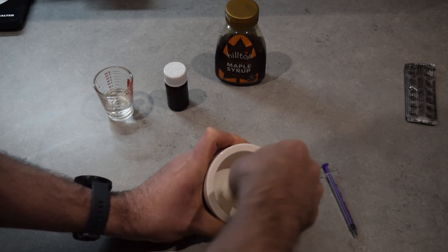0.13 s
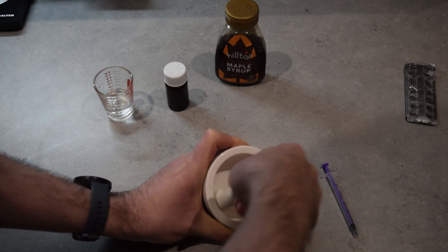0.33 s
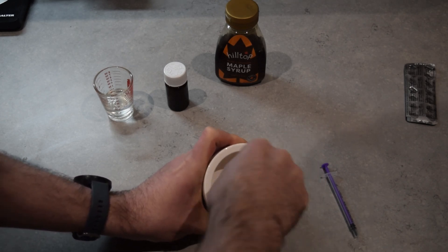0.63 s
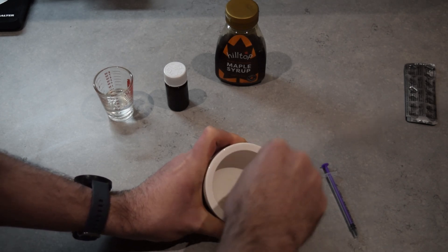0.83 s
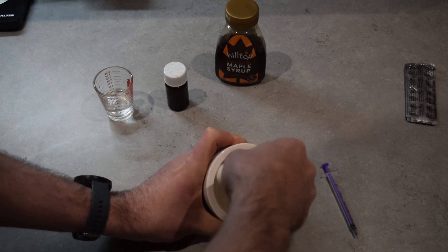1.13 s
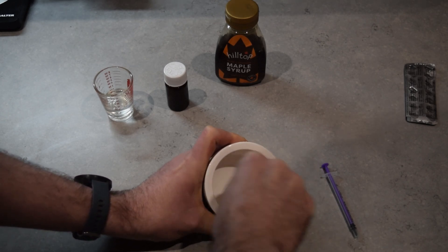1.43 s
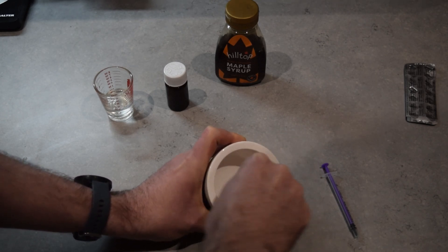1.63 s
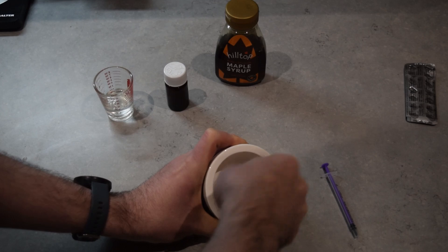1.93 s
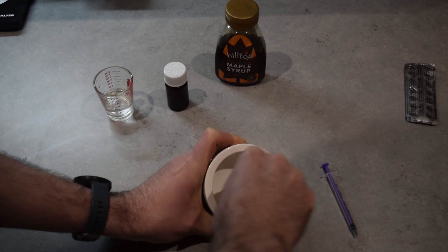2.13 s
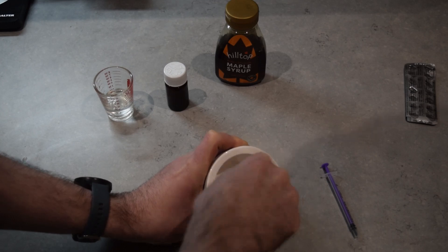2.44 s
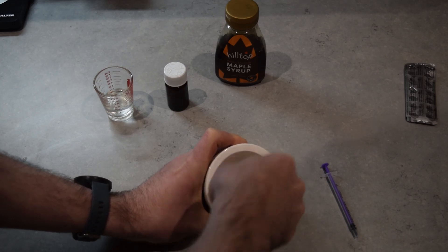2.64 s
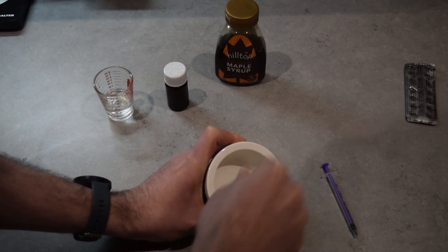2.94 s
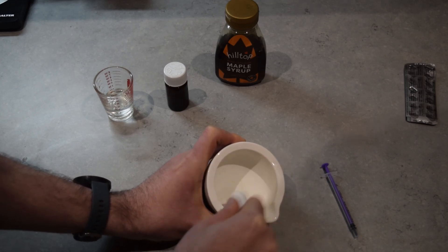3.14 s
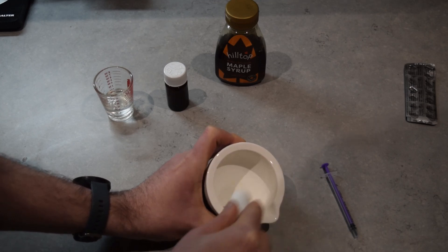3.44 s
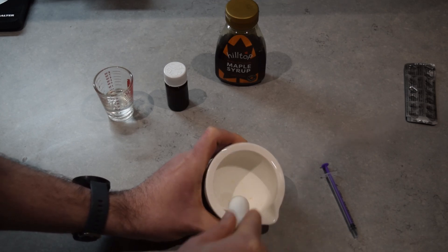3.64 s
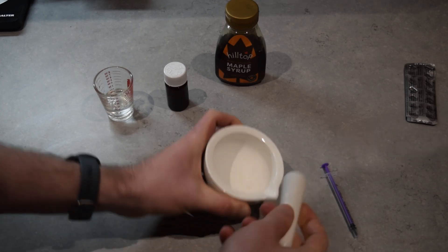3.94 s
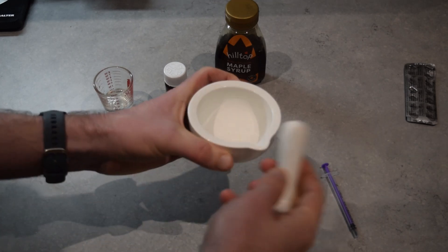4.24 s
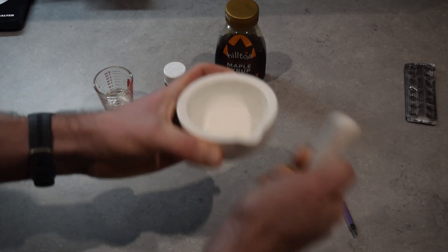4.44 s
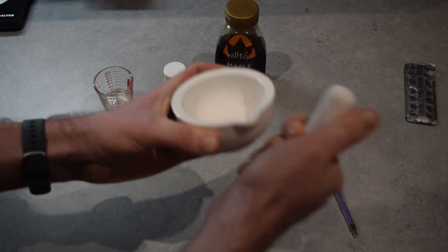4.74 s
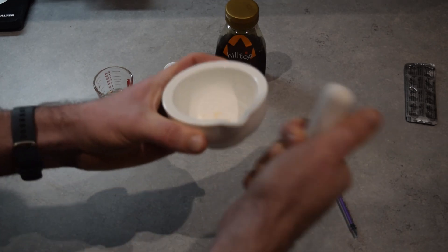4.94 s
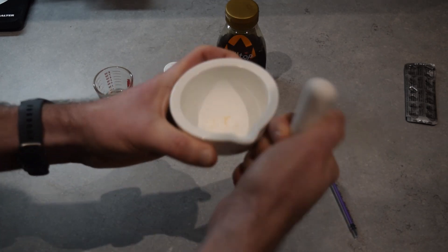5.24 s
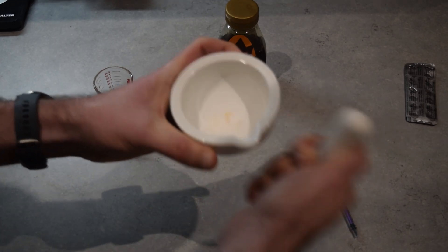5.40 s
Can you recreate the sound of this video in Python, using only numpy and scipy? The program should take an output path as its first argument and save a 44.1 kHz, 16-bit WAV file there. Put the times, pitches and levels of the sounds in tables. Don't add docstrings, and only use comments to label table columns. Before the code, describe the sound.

A ceramic pestle knocks and grinds in a hand-held mortar, then raps its rim in five bright clinks, followed by faint soft taps in a quiet kitchen.

```python
import sys
import numpy as np
from scipy import signal
from scipy.fft import rfft, irfft
from scipy.io import wavfile

SR = 44100
rng = np.random.default_rng(int(sys.argv[2]) if len(sys.argv) > 2 else 0)


def convert_level_to_amplitude(level_db):
    exponent = np.asarray(level_db, float) / 20
    return 10 ** exponent


def generate_wav(signal):
    frames = np.transpose(np.atleast_2d(signal))
    scaled = np.clip(frames, -1, 1) * 32767
    pcm = np.round(scaled).astype(np.int16)
    wavfile.write(sys.argv[1], SR, pcm)


N = 245626


def mortar():
    s, knock_db, hollow_db, ring_db, rim_db, crack_db = blows()
    rough_s, *rough_db, rough_crack_db = rough_contacts()
    rough_knock, rough_hollow, rough_ring, rough_rim = (bursts(rough_s, db, length=0.033) for db in rough_db)
    pressure, hiss = grinding()
    coarse, fine = grit(per_s=900, uneven_db=4.5), grit(per_s=6300, uneven_db=3.5)
    dull = slab(s, knock_db, shoving() * coarse)
    dull = dull + worktop(s, knock_db, pressure, rough_knock, coarse)
    dull = dull + bowl_air(s, hollow_db, pressure, rough_hollow)
    bright = ceramic(s, ring_db, (hiss * convert_level_to_amplitude(-31.0) + rough_ring * convert_level_to_amplitude(-26)) * fine)
    bright = bright + rim(s, rim_db, (hiss * convert_level_to_amplitude(-31) + rough_rim * convert_level_to_amplitude(-26.0)) * fine)
    bright = bright + lip(s, rim_db, hiss * fine)
    bright = bright + pestle(s, crack_db, hiss * fine)
    bright = bright + powder(hiss, fine)
    bright = bright + crack(s, crack_db - 7, length=0.005)
    bright = bright + crack(rough_s, rough_crack_db - 5.5, length=0.022)
    return dull + bright * convert_level_to_amplitude(np.array([[-.7], [.7]]))


RAPS_FROM_S, RAPS_TO_S = 3.0, 3.7
# t/s, worktop knock level/dB, bowl hollow level/dB, ceramic ring level/dB, rim ring level/dB
BLOWS = [(0.048, -11.5, -12.5, -43, -72.5), (0.301, -11.5, -15, -33, -62), (0.577, -31.5, -26, -18.5, -21),
         (0.978, -22, -34, -29, -69), (1.104, -24, -36.5, -57, -67), (1.302, -35.5, -41.5, -34, -48),
         (1.541, -27.5, -52, -78, -78), (2.292, -53, -46, -50, -57), (2.369, -34, -43.5, -55, -77),
         (2.762, -34, -33, -30.5, -50.5), (3.12, -18, -20.5, -11, -10), (3.276, -14.5, -17, -12, -14.5),
         (3.44, -13.5, -16, -14, -15), (3.5841, -17.5, -19.5, -12.5, -14), (3.755, -38, -22, -13.5, -14.5),
         (3.775, -18.5, -23, -19.5, -37.5), (2.303, -57, -43.5, -52.5, -52)]


def blows():
    s, knock_db, hollow_db, ring_db, rim_db = np.transpose(BLOWS)
    grip_db = 4 * (s < RAPS_FROM_S)
    crack_db = np.maximum(ring_db - 4.5 + grip_db, hollow_db - 15.5)
    return s, knock_db, hollow_db, ring_db, rim_db, crack_db


# t/s, worktop knock level/dB, bowl hollow level/dB, ceramic ring level/dB
CRUNCHES = [(0.599, -42, -59, -39.5), (0.642, -28.5, -37.5, -47), (0.694, -32, -39, -48),
            (0.763, -55, -49, -57), (0.828, -34.5, -61, -70), (1.001, -61, -46, -60),
            (1.086, -22.5, -51, -67), (1.331, -55, -70, -65), (1.409, -49, -49, -75),
            (1.462, -45, -50, -75), (1.496, -69, -51, -85), (1.618, -65, -49, -52),
            (1.665, -42, -43.5, -51.5), (1.717, -48, -59, -86), (1.781, -33, -45.5, -72),
            (1.799, -35.5, -62, -96), (1.881, -36.5, -66, -76), (2.069, -43, -74, -81),
            (2.1, -31.5, -51, -65.5), (2.163, -46, -59, -91), (2.208, -32, -57, -88),
            (2.419, -46, -69, -84), (2.463, -31.5, -64, -88), (2.492, -51, -53.5, -88),
            (2.61, -52, -49.5, -62), (2.804, -35, -51, -71), (2.865, -35.5, -49.5, -69)]
REBOUND_S, REBOUND_LOSS_DB = 0.013, (6.5, 13, 13)


def rough_contacts():
    rebounds = []
    for s, *db in BLOWS:
        if RAPS_FROM_S < s < RAPS_TO_S:
            rebounds.append((s + REBOUND_S, *(np.array(db[:3]) - REBOUND_LOSS_DB)))
    s, knock_db, hollow_db, ring_db = np.transpose(list(CRUNCHES) + rebounds)
    rim_db, crack_db = ring_db - 7, ring_db - 0.5
    return s, knock_db, hollow_db, ring_db, rim_db, crack_db


# start t/s, end t/s, pressure level/dB, powder
# hiss level/dB
STROKES = [(0.0, 0.032, -40, -63), (0.62, 0.703, -54, -60), (0.76, 0.84, -51.5, -67),
           (0.99, 1.087, -42, -67), (1.11, 1.19, -46, -71.5), (1.325, 1.524, -45.5, -72.5),
           (1.533, 1.612, -57, -69), (1.686, 1.842, -44.5, -69), (1.872, 1.955, -58.5, -67.5),
           (2.065, 2.144, -50.5, -79), (2.128, 2.323, -48, -73.5), (2.365, 2.438, -43.5, -73),
           (2.481, 2.652, -51, -68), (2.823, 2.872, -44.5, -68)]


def grinding():
    start, end, pressure_db, hiss_db = np.transpose(STROKES)
    effort = dict(rise=892, sag=30.5, fall=287)
    pressure = strokes(start, end, pressure_db, **effort)
    hiss = strokes(start, end, hiss_db, **effort)
    return pressure, hiss * wobble(rate=38, depth_db=4.0)


# t/s, level/dB, length/s
SHOVES = [(0.054, -38, 0.017), (0.33, -43.5, .012), (0.576, -41, 0.12), (0.827, -50, 0.012),
          (1.033, -37.5, 0.082), (1.344, -38.5, 0.17), (1.703, -36, 0.083), (1.884, -46, 0.029),
          (2.099, -44, 0.19), (2.4, -38.5, .1), (2.813, -47.5, .04), (3.118, -34, 0.023),
          (2.087, -58.5, .01), (3.266, -29, 0.017), (3.43, -39, 0.056), (3.591, -33, .012),
          (3.763, -33, 0.01)]


def shoving():
    s, db, length = np.transpose(SHOVES)
    return strokes(s, s + length, db, rise=501, sag=61, fall=224)


# f/Hz, level/dB, t60/s
SLAB = [(59.6, -2.5, .08), (80, -5.5, 0.22), (126.3, 4.5, 0.13), (159.2, 1, 0.17), (207, -4, 0.1)]


def slab(s, knock_db, rumble):
    return band(strike(SLAB, s + .006, knock_db - 27.5, rumble * convert_level_to_amplitude(-37.5), scatter_db=-6.0, spread=0.083), 30, 260)


LOW_SPREAD = .12
# f/Hz, level/dB, t60/s
WORKTOP = [(269.7, -9, 0.042), (412, -22.5, 0.13), (414, -1, 0.051), (441.8, 0, .1), (490, 4.5, 0.035),
           (565, -7, 0.1), (613, 0, 0.041), (734, -3, 0.055), (814.6, 6.5, 0.026), (875, 5.5, 0.028),
           (907, 0.5, 0.043)]


def worktop(s, knock_db, pressure, rough, coarse):
    rub = (pressure * wobble(rate=69, depth_db=5.5) * convert_level_to_amplitude(-35) + rough * convert_level_to_amplitude(-37.0)) * coarse
    return band(strike(WORKTOP, s, knock_db - 8.5, rub, scatter_db=3.0, spread=LOW_SPREAD), 220, 1100)


# f/Hz, level/dB, t60/s
HOLLOW = [(994, -4, 0.048), (1105, 0, 0.04), (1352, 3.5, 0.024), (1406, -3.5, 0.07), (1457, -1.5, 0.025),
          (1611, -10, 0.03), (1681, -10.5, 0.065), (1950, -14.5, 0.024), (2150, -9.5, 0.014),
          (2500, -20, 0.015), (2860, -13, 0.023), (3590, -15.5, 0.017)]


def bowl_air(s, hollow_db, pressure, rough):
    rub = pressure * wobble(rate=10, depth_db=4.0) * convert_level_to_amplitude(-36) + rough * convert_level_to_amplitude(-26.5)
    rub = rub * grit(per_s=1500, uneven_db=2.5)
    return band(strike(HOLLOW, s, hollow_db - 2.5, rub, scatter_db=5.0, spread=LOW_SPREAD), 1000, 7200)


# f/Hz, level/dB, t60/s
CERAMIC = [(4283, -9, .05), (4340, -5, .08), (4362, -22, .4), (4376, 0, .07), (4412, -6, .05),
           (4503, -6, .06), (4570, -11, .04), (4450, 3, .012)]


def ceramic(s, ring_db, rub):
    return band(strike(CERAMIC, s, ring_db - 2.5, rub, scatter_db=3.5, spread=2.3), 1700, 11000)


# f/Hz, level/dB, t60/s
RIM = [(10865, -8, .06), (10955, 0, .08), (11060, -9, .05), (11270, -5, .07)]


def rim(s, rim_db, rub):
    return band(strike(RIM, s, rim_db + 0.5, rub, scatter_db=0, spread=3.5), 8500, 12000)


# f/Hz, level/dB, t60/s
LIP = [(12300, -8, .02), (13100, -3, .04), (13350, 0, .05)]


def lip(s, rim_db, rub):
    return band(strike(LIP, s, rim_db - 14.0, rub * convert_level_to_amplitude(-20.5), scatter_db=-1.0, spread=1.4), 8500, 12000)


# f/Hz, level/dB, t60/s
PESTLE = [(3320, -4, 0.0067), (3800, -6.5, 0.0047), (4300, -3.5, 0.0082), (5050, -1, 0.01),
          (5360, 0.5, 0.0084), (5690, -10, 0.034), (6900, -14.5, 0.00097), (7250, -13, 0.0071),
          (9664, -6, 0.0022)]


def pestle(s, crack_db, rub):
    return band(strike(PESTLE, s, crack_db + 0.5, rub * convert_level_to_amplitude(-32.0), scatter_db=4.0, spread=0.73), 2200, 13000)


# f/Hz, level/dB per Hz
POWDER = [(1200, -19), (2000, -0.5), (3200, -4.5), (5200, 0), (7000, -10), (9500, -10), (13000, -10),
          (15000, -27)]


def powder(hiss, fine):
    grains = fine + 0.57 * rng.standard_normal((2, N))
    return hiss * convert_level_to_amplitude(-8.5) * rms_one(coloured(grains, POWDER))


def crack(times, levels_db, length):
    noise = rng.standard_normal(N) + .5 * rng.standard_normal((2, N))
    contact = bursts(times, levels_db, length) * noise
    contact = contact + bursts(times, levels_db + 10.5, length=0.00019)
    return band(band(contact, 2500, 11000), 1500, 12000)


# f/Hz, level/dB, t60/s
LIFTED = [(1074, -4, 0.0032), (1474, 1, 0.0051), (2994, -15.5, 0.0056), (4346, -1, 0.11),
          (4850, -23.5, 0.13), (4200, -34.5, 0.3), (5370, -3.5, 0.0055), (8020, -13, 0.0041),
          (11080, -19.5, 0.045), (13400, -30.5, .06)]


def clink():
    touch_s, touch_db = np.array([4.3075]), -24
    return band(strike(LIFTED, touch_s, touch_db, np.zeros(N), scatter_db=2, spread=0.68), 490, 14000)


# t/s, peak level/dB, brightness level/dB
TAPS = [
    (4.603, -56.5, -82.5),
    (4.799, -52.5, -72.5),
    (4.966, -54, -61),
    (5.151, -43.5, -48),
    (5.346, -48.5, -49),
    (5.372, -65, -70),
    (5.561, -49.5, -53.5),
]
# f/Hz, level/dB, t60/s
TAP_BODY = [(128, -10.5, 0.011), (330, -4, 0.0098), (617.5, -2.5, 0.016), (995, -2, 0.0041),
            (1330, -7, 0.0104)]
# f/Hz, level/dB, t60/s
TAP_EDGE = [(1500, -4, .006), (2050, 0, .01), (2500, -3, .006)]


def taps():
    s, body_db, edge_db = np.transpose(TAPS)
    still = np.zeros(N)
    body = strike(TAP_BODY, s, body_db + 4.5, still, scatter_db=4.5, spread=0.18)
    edge = strike(TAP_EDGE, s + 0.00105, edge_db + 7.5, still, scatter_db=5, spread=0.27)
    tick = bursts(s, edge_db - 13.5, length=0.037) * rng.standard_normal((2, N))
    return band(body, 83, 1900) + band(edge, 920, 2700) + band(tick, 9300, 12000)


# f/Hz, t60/s, level/dB, left-right likeness [0..1]
KITCHEN = [(86.77, 0.57, -11, 0.98), (324, .6, -6, 0.97), (1150, .65, -14.5, .93), (2550, 0.55, -6, 0.25),
           (4900, .65, -12.5, 0.33), (10150, 0.35, -9.5, 0.16), (13000, 0.33, -22.5, .2)]


def kitchen(x):
    t, tail = np.arange(SR) / SR, 0
    edges = 50 * 2 ** np.arange(0, 8.6, .5)
    for low, high in zip(edges, edges[1:]):
        mid, side = band(rng.standard_normal((2, 2, 1, SR)), low, high)
        t60, level_db, alike = (at_hz(KITCHEN, np.sqrt(low * high), column=c) for c in (1, 2, 3))
        alike = np.clip(alike, 0, 1)
        both = np.sqrt(1 + alike) * mid + np.sqrt(1 - alike) * side * [[1], [-1]]
        tail = tail + both * convert_level_to_amplitude(level_db - 3.5 - 60 * t / t60) / np.sqrt(t60 * SR / 14)
    tail = tail * np.clip((t - .004) / 0.0013, 0, 1)
    return sum(signal.fftconvolve(x[k:k + 1], tail[k], axes=1)[:, :N] for k in range(2))


# f/Hz, level/dB per Hz
AIR = [(20, -12), (45, -20), (90, -31.5), (250, -38), (1700, -47), (3200, -56.5), (5500, -53),
       (16000, -52.5)]


def air():
    white = rng.standard_normal(N) + 0.22 * rng.standard_normal((2, N))
    tone = band(rms_one(coloured(white, AIR)), 36, 9400)
    hum = ring(rng.standard_normal(N) + 0j, hz=57, t60=3.0)
    return convert_level_to_amplitude(-76.5 + 7.0) * tone + convert_level_to_amplitude(-72) * rms_one(band(hum, 45, 100))


def strike(modes, times, levels_db, rub, scatter_db, spread):
    out, at = np.zeros((2, N)), np.minimum(np.round(times * SR).astype(int), N - 1)
    chance = rng.standard_normal((len(at), 3, len(modes)))
    for k, (hz, level_db, t60) in enumerate(modes):
        kicks = rub * np.exp([[0], [1j * spread * chance[0, 2, k]]])
        strength = convert_level_to_amplitude(levels_db + np.clip(scatter_db, -3.0, 3.0) * chance[:, 0, k])
        turn = np.exp(.5j * spread * chance[:, 1, k])
        kicks[0, at] += strength * turn
        kicks[1, at] += strength * turn.conj()
        out += (-1) ** k * convert_level_to_amplitude(level_db) * ring(kicks, hz, t60)
    return out


def ring(kicks, hz, t60):
    pole = convert_level_to_amplitude(-60 / (t60 * SR)) * np.exp(2j * np.pi * hz / SR)
    return signal.lfilter([1], [1, -pole], kicks + 1e-18).imag


def grit(per_s, uneven_db):
    sizes = convert_level_to_amplitude(uneven_db * np.minimum(rng.exponential(1, N), 5)) * rng.choice([-1, 1], N)
    return rms_one(sizes * (rng.random(N) < per_s / SR))


def bursts(times, levels_db, length):
    kicks, r = np.zeros(N), np.exp(-6 / (length * SR))
    kicks[np.round(times * SR).astype(int)] = convert_level_to_amplitude(levels_db)
    return signal.lfilter([np.e * (1 - r)], [1, -2 * r, r * r], kicks + 1e-18)


def strokes(starts, ends, levels_db, rise, sag, fall):
    t, starts, ends = np.arange(0, N + 64, 64) / SR, starts[:, None], ends[:, None]
    db = levels_db[:, None] - rise * np.maximum(starts - t, 0)
    db = db - sag * np.clip(t - starts, 0, ends - starts)
    db = db - fall * np.maximum(t - ends, 0)
    return np.interp(np.arange(N) / SR, t, convert_level_to_amplitude(db).sum(axis=0))


def wobble(rate, depth_db):
    r = np.exp(-2 * np.pi * rate / SR)
    slow = signal.lfilter([1], [1, -2 * r, r * r], rng.standard_normal(N))
    return convert_level_to_amplitude(depth_db * rms_one(slow))


def coloured(x, spectrum):
    hz = np.arange(N // 2 + 1) * SR / N + 1
    return irfft(rfft(x) * convert_level_to_amplitude(at_hz(spectrum, hz)), N)


def at_hz(rows, hz, column=1):
    rows = np.array(rows)
    return np.interp(np.log(hz), np.log(rows[:, 0]), rows[:, column])


def band(x, low_hz, high_hz):
    sos = signal.butter(2, [low_hz, min(high_hz, .45 * SR)], "band", fs=SR, output="sos")
    return signal.sosfilt(sos, x)


def rms_one(x):
    return x / np.sqrt(np.mean(x ** 2) + 1e-20)


def scene():
    near, tapped = mortar() + clink(), taps()
    near = near + tapped + kitchen(near + convert_level_to_amplitude(-3.5) * tapped)
    for _ in range(2):
        near = band(near, 48.33, 15000)
    return near * convert_level_to_amplitude(np.array([[.8], [-.8]])) + air()


def low_pass(x):
    return signal.sosfilt(signal.butter(12, 16450, fs=SR, output="sos"), x)


def record(dry):
    mix = dry - .0006
    return low_pass(mix)


dry = scene()
out = record(dry)
generate_wav(out)
```